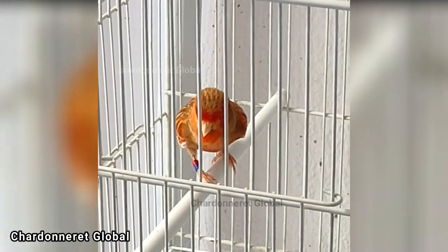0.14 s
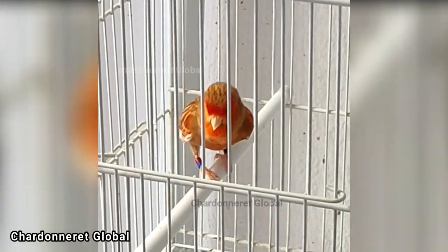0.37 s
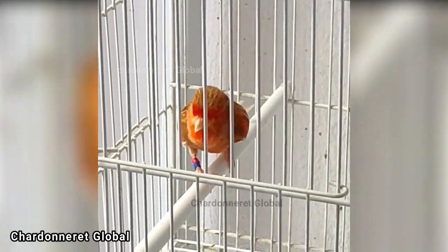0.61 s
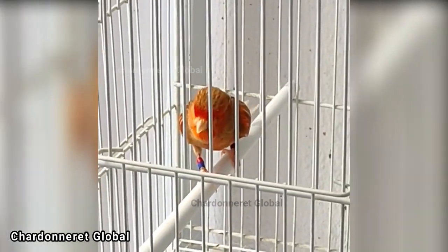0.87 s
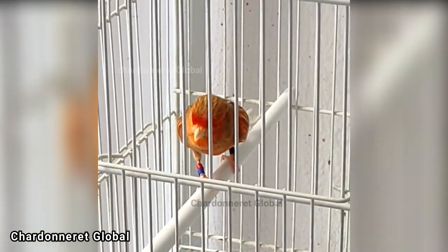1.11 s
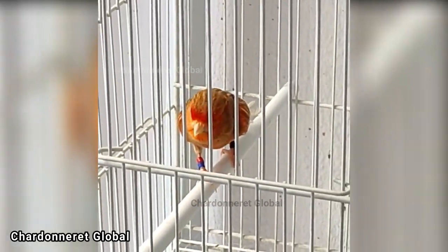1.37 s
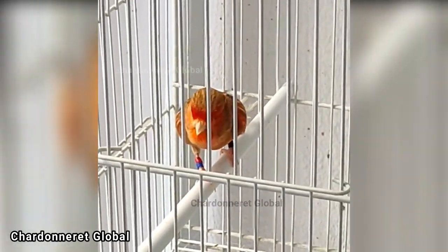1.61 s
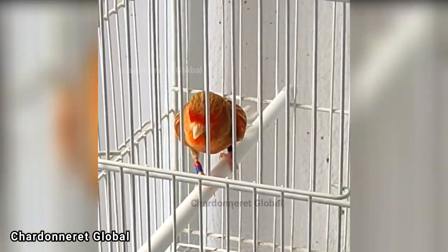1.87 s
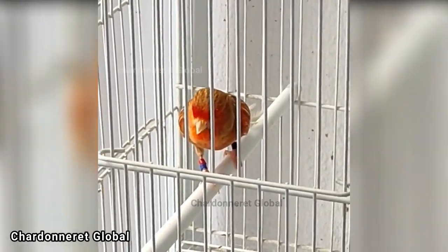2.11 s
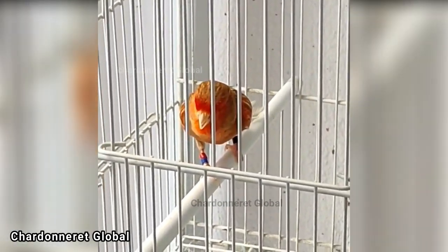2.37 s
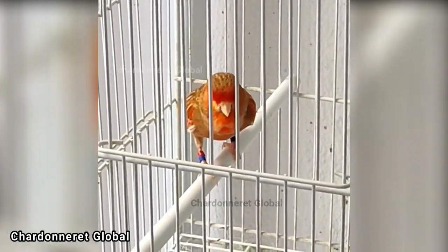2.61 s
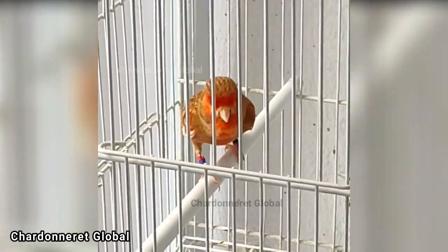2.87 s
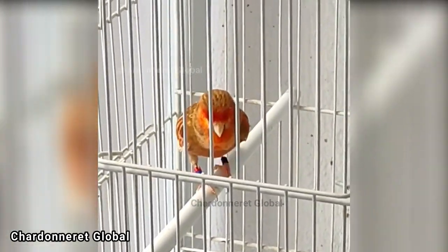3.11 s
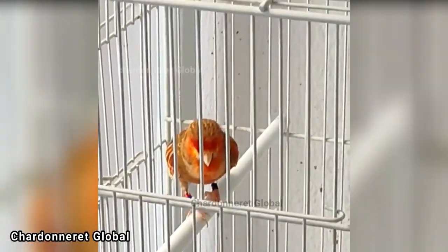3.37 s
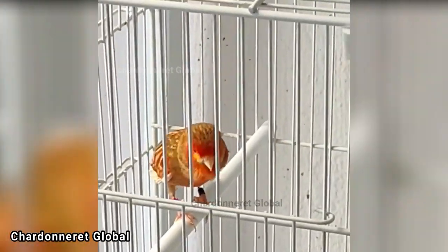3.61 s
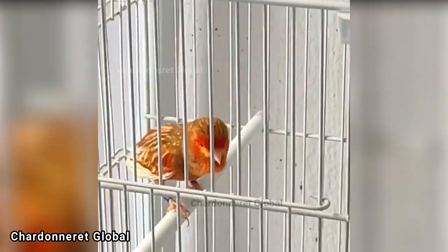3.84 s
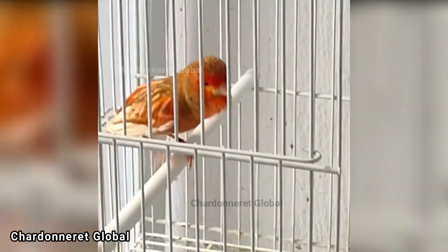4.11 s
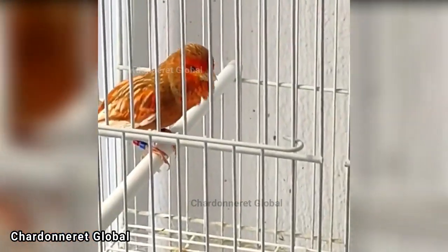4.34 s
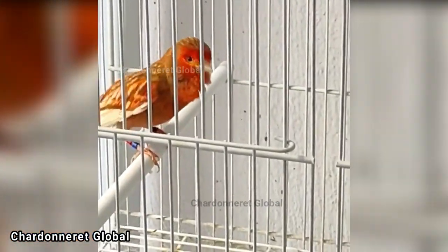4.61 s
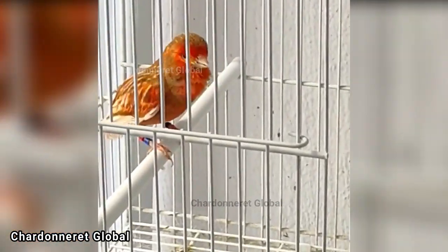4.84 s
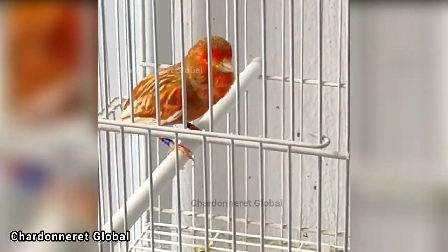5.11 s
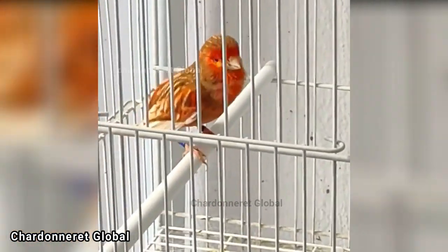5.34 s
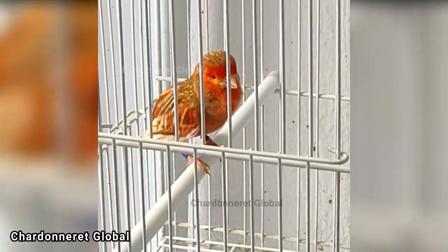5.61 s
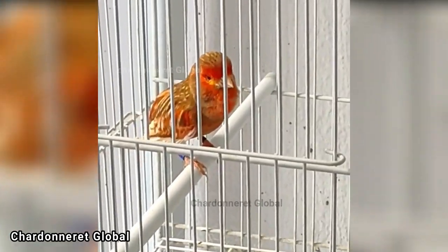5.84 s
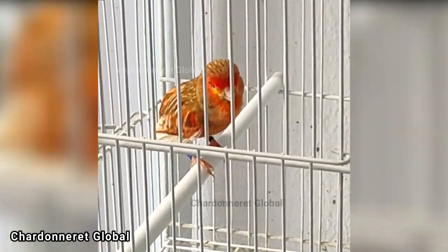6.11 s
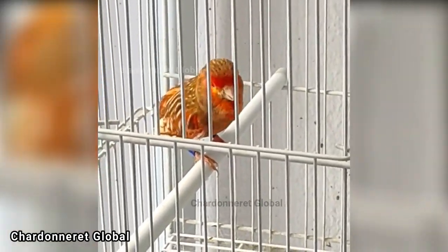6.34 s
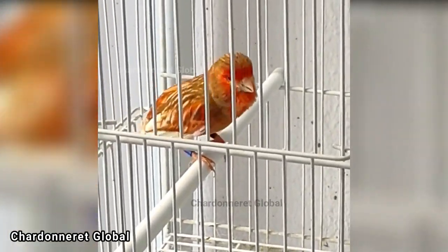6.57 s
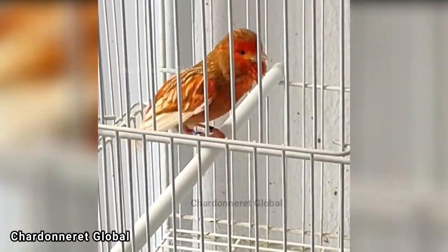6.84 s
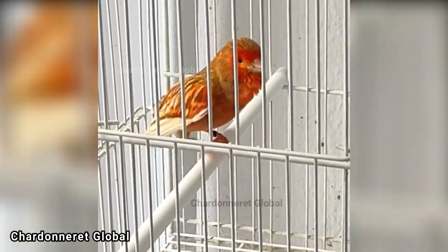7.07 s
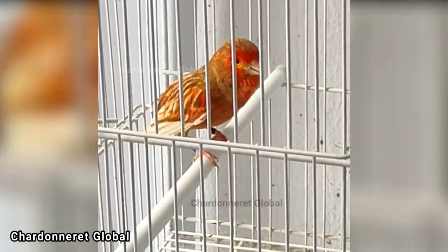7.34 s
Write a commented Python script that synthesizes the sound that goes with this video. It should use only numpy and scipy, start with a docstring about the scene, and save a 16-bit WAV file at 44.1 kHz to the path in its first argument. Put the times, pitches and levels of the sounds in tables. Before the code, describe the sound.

Several canaries sing over one another in a small, hard-walled room, heard close and nearly mono, with a short bright reverberation and a faint blur of farther birds. From 0 to 1.6 s the song is light: quick rolls, lifting notes, a dry purr, thin whistles and sharp chips near 6 kHz. Bubbling upward notes and dropping calls strengthen from 1.7 s. Between 2.6 and 3.7 s a loud, dense run mixes rapid taps, warbles, high lead notes and falling whistles. Around 3.65-4.9 s wings rustle in fast flutters beneath rattles and climbing notes, while a vehicle outside swells in low rumble and tyre roar, peaking near 4.2 and 5.3 s, then fading. Clear pipes enter at 5.2 s, followed by rising notes, steady 3 kHz peeps, short buzzes and level whistles. From 7 s, strong swoops plunge from above 7 kHz, continuing to the end at about 7.5 s.

```python
"""A small hard-walled room: several caged canaries sing over one another in trills, rolls, falling whistles, chips.
Each syllable is a pure gliding tone from the syrinx, roughened by fast uneven throbs, blurred by the walls.
Shaped noise makes the rest: a vehicle passing outside, soft puffs of air, a blur of farther birds,
and wings rustling for about a second. Both channels hear nearly the same."""
import sys
import numpy as np
from scipy import signal
from scipy.fft import rfft, irfft
from scipy.io import wavfile
from scipy.ndimage import uniform_filter1d, map_coordinates

SR = 44100
rng = np.random.default_rng(int(sys.argv[2]) if len(sys.argv) > 2 else 0)


def gain_from_decibels(decibels):
    """Convert decibel values to linear amplitude factors."""
    exponent = np.asarray(decibels, float) / 20
    return 10 ** exponent


def store_pcm(level_fs):
    """Save levels as 16-bit WAV."""
    pcm = np.round(np.clip(level_fs, -1, 1) * 32767).astype(np.int16)
    wavfile.write(sys.argv[1], SR, np.atleast_2d(pcm).T)


N = 328986

# Passing vehicle. Each row: time in seconds, tyre roar level in dB.
STREET_ROAR = [(0, -70.5), (1.3, -66), (2.2, -65.5), (2.74, -60.5), (3.28, -55.5), (3.5, -55.5),
               (3.95, -48), (4.2, -41), (4.92, -48.5), (5.28, -41.5), (5.77, -46.5), (6.3, -51.5),
               (6.9, -56), (7.46, -59)]
# Noise colours of the street. Each row: frequency in Hz, relative density in dB.
RUMBLE_COLOUR = [(53, -46.5), (90, -16.5), (119, -3.5), (194, -2), (231, 1.5), (307, -5), (344, 0.5),
                 (450, -10.5), (580, -34.5), (990, -120)]
ROAR_COLOUR = [(210, -32), (350, -12.5), (435, -13), (574, -9.5), (746, -3.5), (1470, -4.5), (2100, -7.5),
               (2730, -42.5), (4620, -120)]
# Soft puffs of air noise. Each row: peak time in seconds, peak level in dB.
AIR_PUFFS = [(.56, -54), (1.68, -53.5), (2.45, -60.5), (6.922, -64.5)]
# Blur of farther birds. Each row: frequency in Hz, relative density in dB.
FAR_BIRD_COLOUR = [(1400, -25), (2200, -20), (3500, -10.5), (5500, -10.5), (7000, -16.5), (7800, -18)]
# Wing rustle. Each row: time in seconds, level in dB before lift and wing beats.
WING_RUSTLE = [(3.64, -52), (3.68, -43), (3.8, -40.5), (4.1, -50.5), (4.33, -44.5), (4.55, -40),
               (4.84, -47), (4.95, -64)]
# Colour of the rustle. Each row: frequency in Hz, relative density in dB.
WING_COLOUR = [(700, -28), (1100, -12.5), (1800, 1.5), (2600, 1), (4000, -31), (7000, -39.5)]
# Decay of the walls' answer. Each row: frequency in Hz, time to fall 60 dB in seconds.
WALL_DECAY = [(1500, 0.38), (3000, 0.42), (5000, 0.23), (7500, 0.34)]
# Held whistles. Each row: start in seconds, length in seconds, start Hz, end Hz, level in dB.
HELD_WHISTLES = [ (.088, .08, 4220, 3970, -49), (.106, .19, 2600, 2770, -43.5),
                 (.37, .2, 2536, 2700, -41.5), (.666, 0.21, 2510, 2683, -40.5),
                 (1.19, 0.036, 3210, 3267, -53), (1.345, 0.032, 5730, 5780, -48),
                 (1.861, 0.039, 5720, 5790, -42), (1.866, 0.05, 4600, 4620, -42),
                 (2.108, 0.039, 4900, 4960, -50), (2.346, 0.022, 6750, 6400, -42),
                 (3.138, 0.04, 2944, 2972, -22), (3.449, 0.054, 2918, 2902, -22.5),
                 (3.771, .23, 2900, 3145, -34), (4.555, .029, 4160, 4010, -39),
                 (4.65, 0.032, 4400, 4460, -44), (4.75, .07, 4270, 4210, -43),
                 (4.76, 0.04, 5450, 5595, -46), (4.871, .18, 3932, 4106, -41.5),
                 (5.029, 0.045, 2824, 3125, -25), (5.094, 0.043, 3920, 4050, -42.5),
                 (5.127, 0.088, 5030, 5320, -42.5), (5.168, .11, 4230, 4500, -35.5),
                 (5.788, 0.065, 6240, 6800, -39.5), (5.93, 0.033, 4954, 5150, -32.5),
                 (5.927, .033, 6730, 6960, -44.5), (6.415, .063, 4040, 4130, -33.5),
                 (6.545, 0.045, 3998, 4017, -23.5), (6.56, 0.039, 6460, 6660, -41.5),
                 (6.665, .064, 3980, 4010, -26), (6.72, .034, 4765, 4540, -29),
                 (6.769, .11, 4005, 4027, -22.5), (6.898, .06, 4130, 3941, -32.5),
                 (6.991, 0.073, 3980, 3900, -30), (7.102, .09, 3996, 3935, -25.5),
                 (7.26, 0.075, 6822, 6590, -35), (7.271, .12, 3980, 3885, -24)]
# Single calls: shape, wall level in dB re direct, nominal throb depth in dB, calls.
# Each shape row: time in seconds, pitch ratio, level in dB added to the call's.
# Each call row: start in seconds, base pitch in Hz, base level in dB.
CHIP_CALL = ([(0, 1, -6.5), (.015, 1.001, 2), (.03, .98, 7.5), (.042, .87, 5.5)],
              2.795, 4, [(0.487, 6310, -30.5), (0.633, 6150, -30.5), (1.003, 5920, -29),
              (1.605, 6165, -29.5), (1.995, 5864, -28.5), (2.402, 6234, -26.5), (2.815, 6190, -25.5),
              (3.21, 6260, -34), (3.662, 6100, -31), (4.385, 6280, -29), (4.555, 6180, -29.5),
              (4.86, 6220, -29), (5.25, 6200, -30.5), (5.615, 6204, -29.5), (6.053, 5900, -31.5)])
CHEEP_CALL = ([(0, 0.99, -8.5), (.03, 1, 3), (.055, 0.92, -1.5)], 3.7, 4.1, [ (.09, 6423, -27.5),
               (1.205, 6390, -46), (4.08, 6470, -29.5), (4.305, 6394, -28), (6.235, 5960, -46)])
SWOOP_CALL = ([(0, 0.99, -14.5), (.04, .76, 0), (.08, .59, 0.5), (.13, .42, -5)],
               5.45, 3.9, [(6.99, 7170, -22), (7.14, 7580, -17), (7.325, 7557, -16.5)])
DROP_CALL = ([(0, 0.91, -28), (.03, 0.94, -5.5), (.07, .84, -0.5), (.14, .62, 1.5)],
              8.8, 6.8, [(1.92, 5920.0, -24), (2.263, 6050, -22)])
FLICK_CALL = ([(0, 1, 7.1), (.008, 1.28, 8), (.018, 1.43, 2)], 4.8, 11, [ (.462, 5420, -38),
               (.89, 5340, -48), (.912, 5020, -41), (1.585, 5460, -51.5), (1.875, 5250, -43.5),
               (1.893, 5120, -27), (2.548, 5240, -30.5), (2.716, 5560, -41), (3.558, 5250, -36),
               (4.293, 5520, -49.5), (4.65, 5730, -53.5), (5.15, 5160, -49), (5.175, 5380, -39),
               (5.831, 5050, -36)])
CROAK_CALL = ([(0, 0.93, -0.5), (.03, .93, -2.5), (.08, .8, -20.5)], 10.1, 19, [(0, 2905, -45.5),
               (0.478, 2210, -43.5), (1.436, 2334, -43), (1.588, 2094, -50), (2.465, 2135, -42),
               (3.187, 2100, -44.5), (5.664, 2425, -45)])
# Trills: the same four parts, but a phrase in place of the calls, read between its rows for every note.
# Each phrase row: start in seconds, note number, base pitch in Hz, base level in dB.
ROLL_TRILL = ([(0, .88, -5.5), (.012, 1.08, 1.5), (.04, 1.12, -2)], 5, 4, [ (.006, 0, 3200, -39),
               (.414, 7, 3080, -40.5), (.472, 8, 3150, -36), (.531, 9, 3126, -39), (.591, 10, 3040, -50)])
LIFT_TRILL = ([(0, 1, -12), (.03, 1.12, -3), (.08, 1.18, -4)], 11, 12, [ (.165, 0, 3700, -48),
               (.525, 2, 3700, -36), (.9, 4, 3700, -35)])
TOP_TRILL = ([(0, .88, -12), (.03, .99, -6), (.045, 1, 0), (.095, 1, -3)], 4, 5, [ (.37, 0, 5320, -43),
              (.725, 2, 5240, -40), (.92, 3, 5250, -34)])
DIP_TRILL = ([(0, 1, -8), (.02, .89, 5), (.045, .83, 3), (.065, .8, -3)], 9, 12, [ (1.09, 0, 4750, -42),
              (1.228, 2, 4650, -44), (1.371, 4, 4700, -41), (1.514, 6, 4650, -44.5), (1.657, 8, 4590, -37)])
PURR_TRILL = ([(0, 1, 0), (.007, .82, 1), (.015, .68, 0)], 5, 3, [ (1.087, 0, 3800, -44),
               (1.345, 15, 3800, -43), (1.675, 34, 3800, -45)])
BUBBLE_TRILL = ([(0, 0.93, -1), (.012, 1.28, 0), (.03, 1.37, 1), (.05, 1.42, 1)],
                 5.5, 3, [ (1.674, 0, 2430, -33), (1.738, 1, 2632, -27.5), (2.09, 6, 2575, -24.5),
                 (2.236, 8, 2500, -30), (2.454, 11, 2600, -23), (2.525, 12, 2450, -27),
                 (2.604, 13, 2627, -22)])
TAP_TRILL = ([(0, 0.98, 2), (.015, .9, 2), (.03, 0.68, -12.5)], 5.2, 4.7, [ (2.678, 0, 3380, -19),
              (2.976, 2, 3420, -23), (3.125, 3, 3450, -21), (3.43, 5, 3480, -24), (3.58, 6, 3600, -20)])
WARBLE_TRILL = ([(0, 1, 0), (.02, 1.06, 2), (.06, 1.11, -10.5)], 3.5, 8.2, [ (2.745, -0.5, 3080, -25.5),
                 (3.055, 5, 2960, -31), (3.195, 7.5, 2886, -28.5), (3.375, 10, 2902, -32),
                 (3.52, 13.5, 2976, -29.5), (3.61, 15, 3070, -32.5)])
LEAD_TRILL = ([(0, 1, 0), (.045, .965, 0)], 1.5, 2.5, [ (2.726, 0, 5440, -26), (2.87, 1, 5450, -45),
               (3.012, 2, 5480, -25), (3.168, 3, 5480, -33), (3.323, 4, 5500, -23), (3.624, 6, 5300, -30)])
FALL_TRILL = ([(0, 1, -12), (.02, .92, -3), (.045, .82, 4), (.085, .69, -3)], 5, 6, [ (2.582, 0, 4950, -24),
               (2.892, 2, 4950, -24), (3.033, 3, 5100, -22.5), (3.342, 5, 5080, -21.5),
               (3.646, 7, 5000, -22.5)])
RATTLE_TRILL = ([(0, 0.94, -2.5), (.012, .91, 8.5), (.026, .79, 4.5), (.038, .66, 1)],
                 5.5, 5, [ (3.814, 0, 5050, -34.5), (3.97, 3, 5200, -34.5), (4.137, 6, 5190, -32),
                 (4.198, 7, 5060, -39.5)])
CLIMB_TRILL = ([(0, 1, -1.5), (.025, 1.04, -1), (.045, 1.2, 4), (.07, 1.34, 5), (.125, 1.4, -3)],
                7.1, 7, [ (4.124, 0, 2870, -33), (4.35, 1, 2880, -34.5), (4.56, 2, 2980, -37),
                (4.785, 3, 3000, -35.5), (5.02, 4, 3000, -35)])
CHUCK_TRILL = ([(0, 0.97, 11), (.012, .83, 4), (.025, .86, -2.5), (.048, .99, -1)],
                3, 4.4, [ (4.808, 0, 2960, -30), (5.025, 3, 3020, -30), (5.386, 8, 2910, -34),
                (5.747, 13, 2980, -29)])
PIPE_TRILL = ([(0, 1, -16), (.01, 1.19, -7), (.03, 1.21, 1), (.058, 1.2, -4)],
               .6, 3, [ (5.21, 0, 4125, -23), (5.295, 1, 3950, -21.5), (5.641, 5, 3920, -19)])
RISE_TRILL = ([(0, 1, 5), (.03, 1.17, 4), (.065, 1.37, 1)], 3.9, 4.1, [ (5.729, 0, 3620, -27),
               (5.997, 3, 3500, -29.5), (6.08, 4, 3400, -28.5)])
BOW_TRILL = ([(0, 1, 2), (.03, .79, -3), (.065, .68, -1)], 7.2, 2.76, [ (5.825, 0, 3550, -28.5),
              (6.585, 7, 3550, -27.5), (7.344, 14, 3550, -34.5)])
PEEP_TRILL = ([(0, 1, 2), (.02, 1.001, 2), (.04, .985, -1)], 1.3, 1.2, [ (6.35, 0, 3140, -26.5),
               (6.423, 1, 3090, -23), (6.672, 4, 3120, -27), (6.764, 5, 3110, -22.5),
               (6.928, 7, 3110, -24.5), (6.998, 8, 2980, -33)])
BUZZ_TRILL = ([(0, 1, -10), (.006, 0.76, 4.5), (.015, .63, 8), (.016, 1, -8), (.03, .7, -4)],
               7.1, 10, [ (6.324, 0, 7450, -38.5), (6.568, 3, 7200, -38.5), (6.733, 5, 7270, -34.5),
               (6.9, 7, 7240, -43)])
# Gains of the two treble copies, one list each. Each row: frequency in Hz, gain in dB.
COPY_GAINS = ([(7800, -43.5), (9500, -40), (11000, -34), (11700, -36)], [(11700, -54.5), (13500, -50),
               (15000, -39), (15700, -28)])

CALLS = (CHIP_CALL, CHEEP_CALL, SWOOP_CALL, DROP_CALL, FLICK_CALL, CROAK_CALL)
TRILLS = (ROLL_TRILL, LIFT_TRILL, TOP_TRILL, DIP_TRILL, PURR_TRILL, BUBBLE_TRILL,
          TAP_TRILL, WARBLE_TRILL, LEAD_TRILL, FALL_TRILL, RATTLE_TRILL, CLIMB_TRILL,
          CHUCK_TRILL, PIPE_TRILL, RISE_TRILL, BOW_TRILL, PEEP_TRILL, BUZZ_TRILL)


def unit(x):
    """Scaled to rms 1."""
    return x / np.sqrt(np.mean(x ** 2) + 1e-20)


def along(points, hz):
    """(Hz, value) points read on a log frequency axis."""
    point_hz, value = np.transpose(points)
    return np.interp(np.log(hz + 1), np.log(point_hz + 1), value)


def level_curve(rows):
    """(s, dB) rows as one dB value per sample; -120 dB outside."""
    s, db = np.transpose(rows)
    return np.interp(np.arange(N) / SR, s, db, left=-120, right=-120)


def wobble(knots_per_s):
    """Smooth random curve through random knots."""
    knots = rng.standard_normal(int(N * knots_per_s / SR) + 4)
    return map_coordinates(knots, [np.arange(N) * knots_per_s / SR])


def patch_field(shape, bins, frames):
    """Random field of rms 1, smoothed over frequency bins and time frames."""
    field = uniform_filter1d(rng.standard_normal(shape), size=bins, axis=0)
    return unit(uniform_filter1d(field, size=frames, axis=1))


def rush(colour, patchy_db):
    """Coloured noise of rms 1 with patches of random gain."""
    hz, _, z = signal.stft(rng.standard_normal(N), SR, nperseg=4096)
    below = [(1, -120), (colour[0][0] * .8, -60)]
    above = [(colour[-1][0] * 1.3, -120)]
    colour_db = along(below + list(colour) + above, hz)[:, None]
    gain_db = colour_db + patchy_db * patch_field(z.shape, bins=40, frames=2)
    return unit(signal.istft(z * gain_from_decibels(gain_db), SR, nperseg=4096)[1][:N])


def street():
    """Vehicle noise: tyre roar, with rumble and hum growing more slowly in dB than the roar."""
    roar_db = level_curve(STREET_ROAR)
    over_db = roar_db + 50  # rumble and hum levels hold at a roar of -50 dB
    rumble_db = -60.5 + 0.79 * over_db
    hum_db = -75 + 0.48 * over_db + 3 * wobble(2.6)
    roar = gain_from_decibels(roar_db) * rush(ROAR_COLOUR, patchy_db=1.64)
    rumble = gain_from_decibels(rumble_db) * rush(RUMBLE_COLOUR, patchy_db=1.0)
    hum = gain_from_decibels(hum_db) * rush([(25, -20.5), (56, -16.5), (65, 3), (78, -14.5)], patchy_db=-2.0)
    return roar + rumble + hum


def air_puffs():
    """Short soft puffs of noise, rising and falling at steady dB rates."""
    rise_db_per_s, fall_db_per_s = 142.5, 107
    t = np.arange(N) / SR
    swell = np.zeros(N)
    for s, peak_db in AIR_PUFFS:
        swell += gain_from_decibels(peak_db + np.minimum(rise_db_per_s * (t - s), fall_db_per_s * (s - t)))
    return swell * rush(ROAR_COLOUR, patchy_db=4.1)


def far_birds():
    """Farther birds blurred into patchy noise."""
    return gain_from_decibels(-55.0 + 0.5 * wobble(1.1)) * rush(FAR_BIRD_COLOUR, patchy_db=9.5)


def wing_rustle():
    """Rustling noise pulsing with the wing beats."""
    beat_hz, beat_peak_s, beat_db, lift_db = 16.9, 4.327, 3, 4.5
    t = np.arange(N) / SR
    beats_db = beat_db * np.cos(2 * np.pi * beat_hz * (t - beat_peak_s))
    return gain_from_decibels(level_curve(WING_RUSTLE) + lift_db + beats_db) * rush(WING_COLOUR, patchy_db=4.0)


def room(x, wet_db):
    """Direct sound plus the walls' answer, each frequency dying at its own speed."""
    hz, t, z = signal.stft(rng.standard_normal(SR // 2), SR, nperseg=128)
    decay = gain_from_decibels(-60 * t / along(WALL_DECAY, hz)[:, None])
    tail = signal.istft(z * decay, SR, nperseg=128)[1]
    tail *= 1 + 0.56 * np.exp(-np.arange(len(tail)) / (0.02 * SR))  # nearest walls answer loudest
    tail = np.pad(tail / np.linalg.norm(tail), (int(.004 * SR), 0))  # first wall 4 ms late
    return x[:N] + gain_from_decibels(wet_db) * signal.fftconvolve(x, tail)[:N]


def rough(line, depth_db):
    """Random fast changes of level spread each tone into a band."""
    swing = np.tanh(1.12 * wobble(650) + 0.47 * wobble(220))  # bounded
    throb = gain_from_decibels(depth_db * 1.45 * swing)
    return line[:N] * unit(throb)


def add_syllable(line, s, shape, hz, db, fade_s):
    """Syrinx: one gliding tone with soft ends, laid on the line at s."""
    at_s, ratio, level_db = np.transpose(shape)
    t = np.arange(int(at_s[-1] * SR)) / SR
    ends = np.clip(np.minimum(t, at_s[-1] - t) / fade_s, 0, 1)
    envelope = gain_from_decibels(db + np.interp(t, at_s, level_db)) * np.sin(ends * np.pi / 2) ** 2
    tone = np.sin(2 * np.pi * np.cumsum(hz * np.interp(t, at_s, ratio)) / SR)
    line[max(round(s * SR), 0):][:len(t)] += envelope * tone


def whistles():
    """Held notes that drift slowly in pitch and waver in strength."""
    line = np.zeros(N + SR)
    for s, length_s, start_hz, end_hz, db in HELD_WHISTLES:
        glide = [(0, 1, 0), (length_s, end_hz / start_hz, 0)]
        add_syllable(line, s, glide, start_hz, db, fade_s=0.011)
    waver = gain_from_decibels(2.2 * wobble(40))
    return room(rough(line, depth_db=2.5) * waver, wet_db=1.5)


def voice(shape, wet_db, throb_db, sung):
    """One syllable shape sung at each (s, Hz, dB), roughened, with its own wall level."""
    line = np.zeros(N + SR)
    for s, hz, db in sung:
        add_syllable(line, s, shape, hz, db, fade_s=0.0048)
    return room(rough(line, throb_db), wet_db)


def single_calls():
    """Calls that repeat a shape, each at its own pitch and strength."""
    return sum(voice(*call) for call in CALLS)


def phrase_notes(phrase):
    """Every note of a phrase as (s, Hz, dB), scattered in pitch and level."""
    scatter_share, scatter_db = 0.0038, 0.55
    s, number, hz, db = np.transpose(phrase)
    each = np.arange(round(number[-1]) + 1)
    chance = rng.standard_normal((len(each), 2))
    note_hz = np.interp(each, number, hz) * (1 + scatter_share * chance[:, 0])
    note_db = np.interp(each, number, db) + scatter_db * chance[:, 1]
    return zip(np.interp(each, number, s), note_hz, note_db)


def trills():
    """Runs of one repeated syllable, gliding from row to row of their phrase."""
    out = np.zeros(N)
    for shape, wet_db, throb_db, phrase in TRILLS:
        out += voice(shape, wet_db, throb_db, phrase_notes(phrase))
    return out


def treble_side_patches(mid, threshold, side_db):
    """Artefact, not a source: random treble patches differ between left and right."""
    hz, _, z = signal.stft(mid, SR, nperseg=1024)
    patches = patch_field(z.shape, bins=48, frames=3) > threshold
    patches = patches * (hz > 4200)[:, None]
    side = signal.istft(z * patches * rng.standard_normal(z.shape), SR, nperseg=1024)[1][:N]
    return gain_from_decibels(side_db) * side


def scene():
    """Background and all birds, almost alike in both channels."""
    background = street() + air_puffs() + far_birds() + wing_rustle()
    mid = background + whistles() + single_calls() + trills()
    side = treble_side_patches(mid, threshold=1.4, side_db=-3.0)
    return np.array([mid + side, mid - side])


def band_limit(x):
    """A steep low-pass at the top of the band."""
    return signal.sosfilt(signal.butter(12, 15800, fs=SR, output="sos"), x)


def record(dry):
    """Band extension: two faint upward copies of the octave below replace sound above twice the shift."""
    shift_hz = 3897.5
    hz, spectrum = np.fft.rfftfreq(N, 1 / SR), rfft(dry)
    shift_bins = round(shift_hz * N / SR)
    kept = spectrum * (hz < 2 * shift_hz)
    octave = kept * (hz > shift_hz)
    copies = 0
    for k, gain in enumerate(COPY_GAINS, start=1):
        copies = copies + np.roll(octave, k * shift_bins, axis=1) * gain_from_decibels(along(gain, hz))
    mix = irfft(kept + copies, N)
    return band_limit(mix)


dry = scene()
out = record(dry)
store_pcm(out)
```